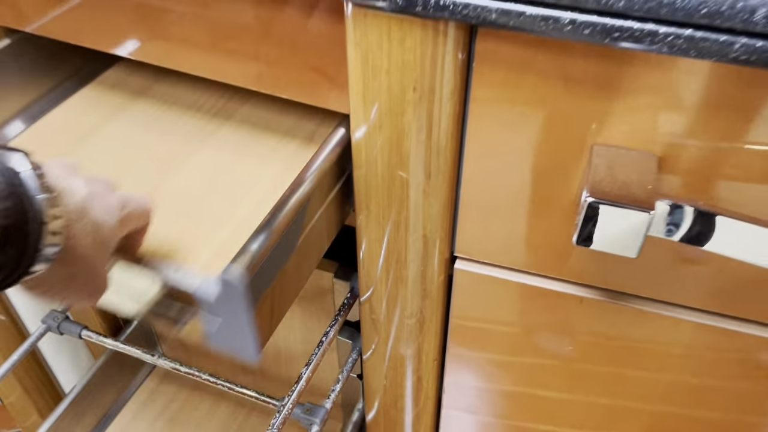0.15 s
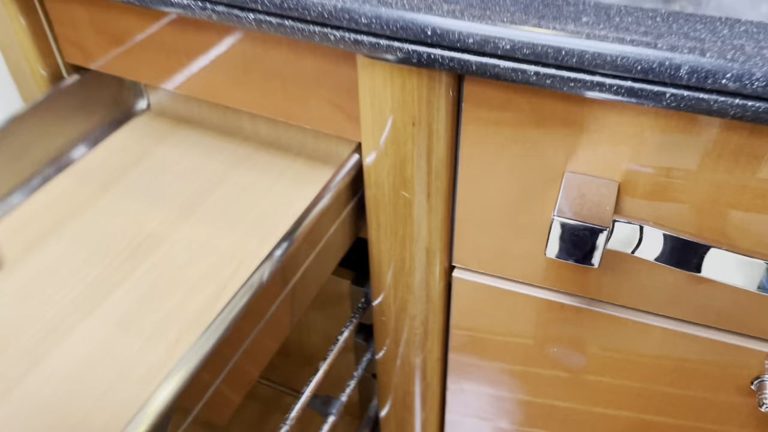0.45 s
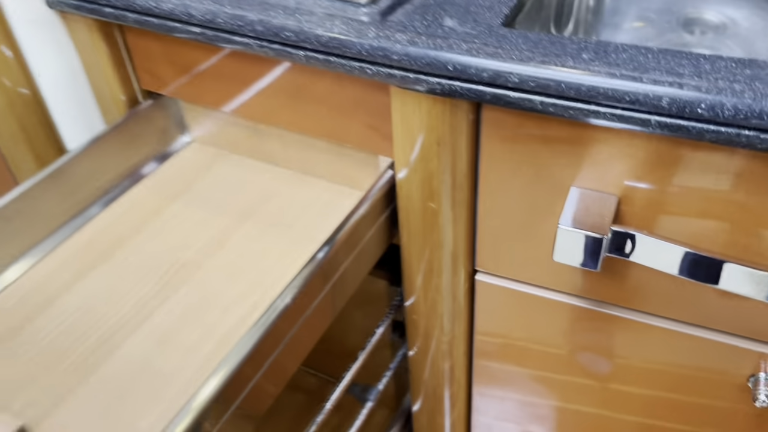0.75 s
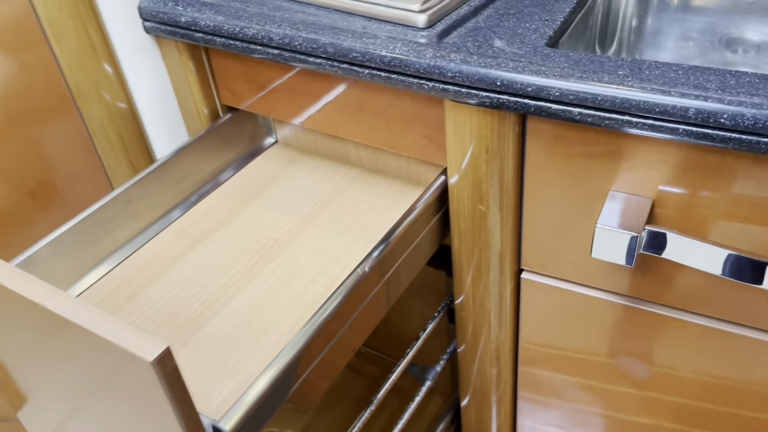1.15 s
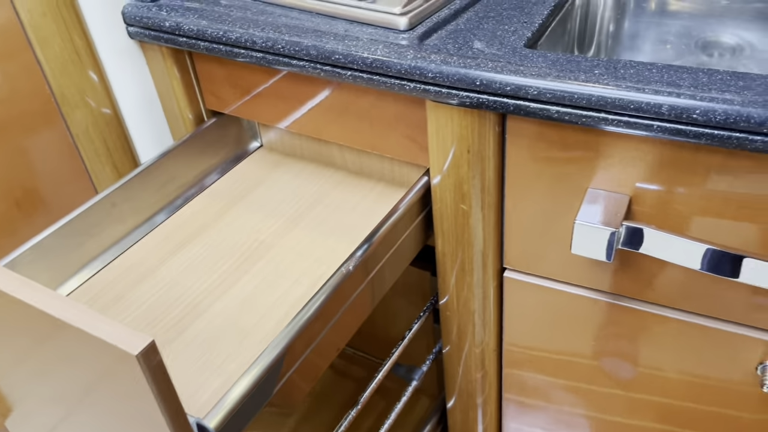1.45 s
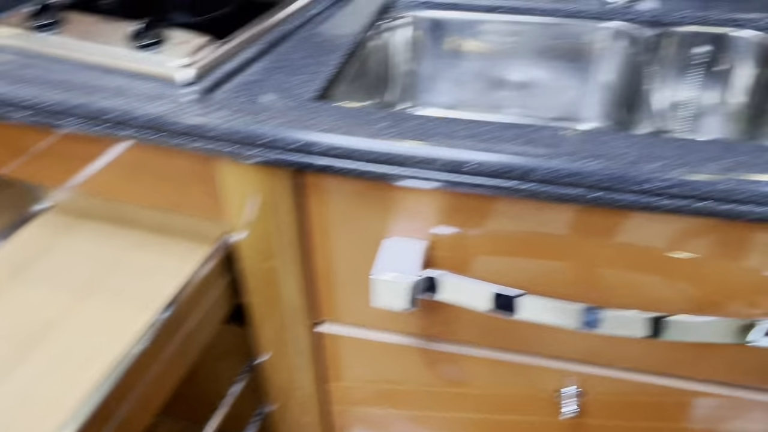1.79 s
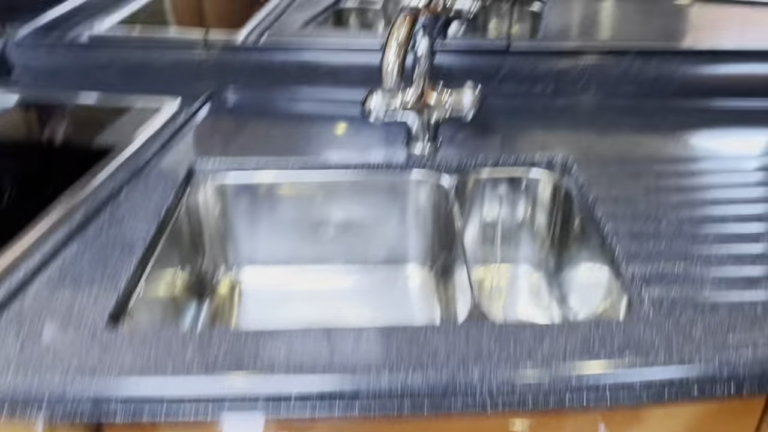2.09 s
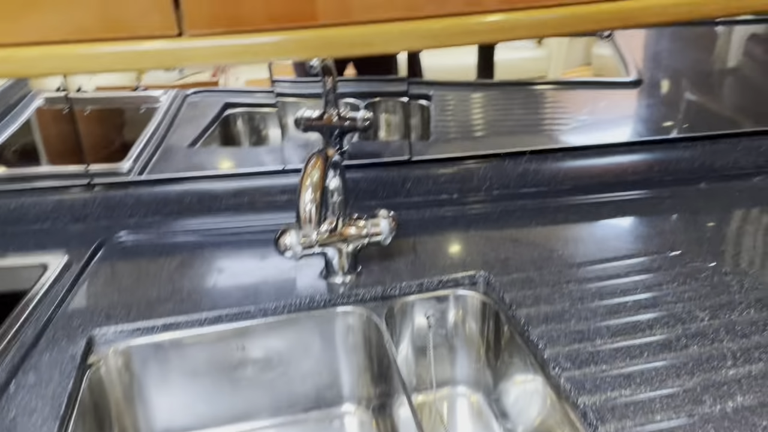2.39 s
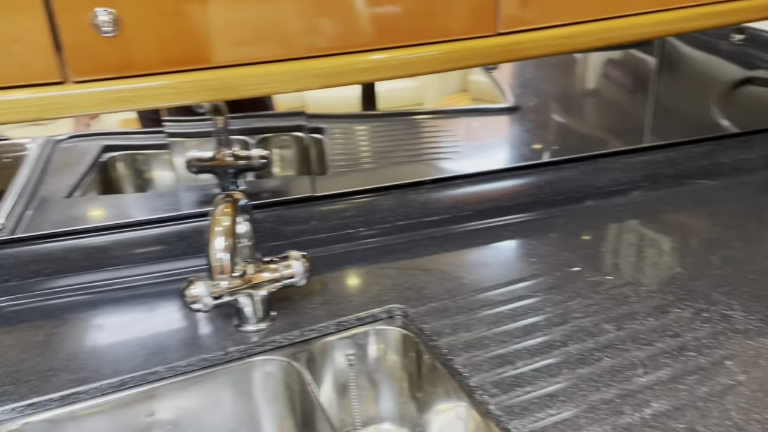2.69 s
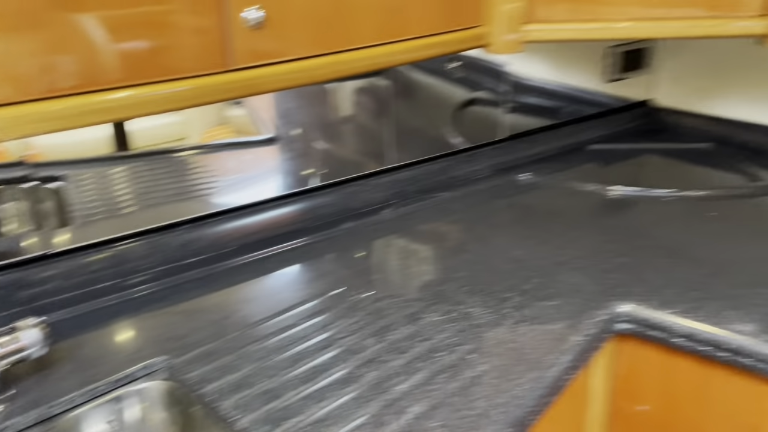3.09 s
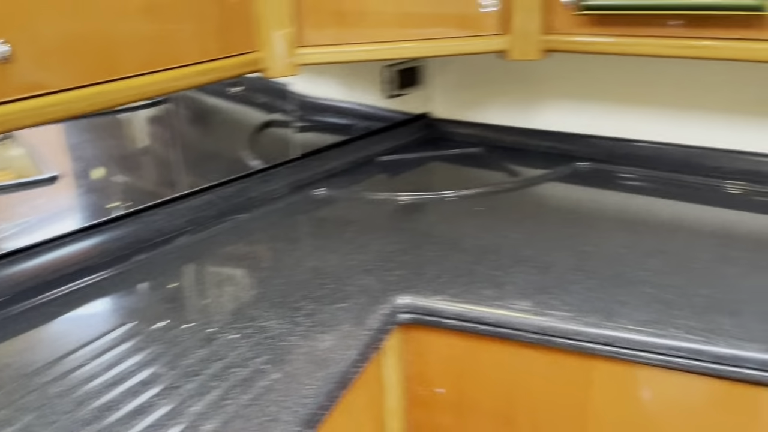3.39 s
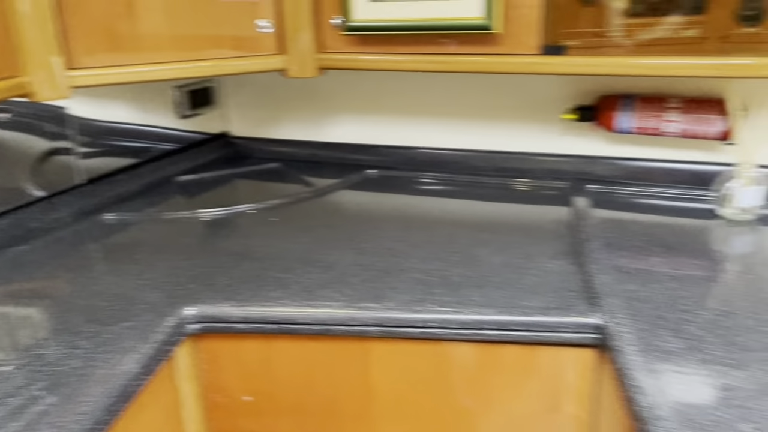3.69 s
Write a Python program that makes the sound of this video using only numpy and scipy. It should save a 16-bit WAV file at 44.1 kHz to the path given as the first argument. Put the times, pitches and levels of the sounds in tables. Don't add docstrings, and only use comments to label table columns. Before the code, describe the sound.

A wooden drawer already rolls on metal ball runners, ticking faintly, bumps over a catch at 0.2 s and slams its stop at 0.54 s with a hard metallic crack. Rumble fades to near quiet by 1.1 s, with a faint sleeve brush around 1.4-1.9. A booming knock frees it at 1.95; it rolls back softly, rattling, bangs shut at 3.04, rebounds dully around 3.25, then settles in the quiet, close cabin.

```python
import sys
import numpy as np
from scipy import signal
from scipy.fft import rfft, irfft
from scipy.io import wavfile
from scipy.ndimage import uniform_filter1d

SR = 44100
rng = np.random.default_rng(int(sys.argv[2]) if len(sys.argv) > 2 else 0)


def bounce(signal):
    frames = np.transpose(np.atleast_2d(signal))
    limited = np.clip(frames, -1, 1)
    pcm = np.round(limited * 32767).astype(np.int16)
    wavfile.write(sys.argv[1], SR, pcm)


def rack_gain(trim_db):
    fader = np.asarray(trim_db, float)
    return 10 ** (fader / 20)


N = 169785
T = np.arange(N) / SR
LEFT_RIGHT = np.array([[.5], [-.5]])


def on_hz(hz, table):
    a = np.array(table)
    return np.interp(np.log(np.maximum(hz, 1)), np.log(a[:, 0]), a[:, 1])


def unit(x):
    return x / np.sqrt(np.mean(x ** 2) + 1e-18)


def peak(x, db):
    return rack_gain(db) * x / np.sqrt(uniform_filter1d(x ** 2, 441).max())


def shade(x, gain):
    size = x.shape[-1]
    return irfft(rfft(x) * gain(np.arange(size // 2 + 1) * SR / size), size)


def coloured(table, size=N):
    return unit(shade(rng.standard_normal(size), lambda hz: rack_gain(on_hz(hz, table))))


def ring(modes, longest):
    t = T[:SR // 2, None]
    hz, db, t60 = np.array(modes).T
    sign = (-1) ** np.arange(len(hz))
    decay = rack_gain(-60 * t / np.clip(t60, .01, longest))
    h = (sign * rack_gain(db) * np.sin(2 * np.pi * hz * t) * decay).sum(axis=1)
    return h / np.abs(h).max()


def walk(rate):
    k = int(SR / rate)
    steps = np.repeat(rng.standard_normal(N // k + 1), k)
    return unit(uniform_filter1d(uniform_filter1d(steps, k), k)[:N])


def clicks(rate, scatter_db, size):
    happens, side, strength = rng.random((3, size))
    return (happens < rate / SR) * np.sign(side - .5) * rack_gain(-scatter_db * np.log(1 - strength))


def add(out, x, at):
    i = int(at * SR)
    out[..., i:i + x.shape[-1]] += x[..., :out.shape[-1] - i]


# (frequency [Hz], level [dB])
CABIN_FLOOR = [(15, -37), (25, -2.5), (74, -11.5), (114, -17.5), (157, -18), (249, -30), (439, -38),
               (16000, -62.5)]


def cabin():
    floor_db = -56.5
    alike = coloured(CABIN_FLOOR)
    apart = np.array([coloured(CABIN_FLOOR), coloured(CABIN_FLOOR)])
    rumble = shade(alike, lambda hz: hz < 400)
    wander = rack_gain(3 * walk(2.5)) - 1
    return rack_gain(floor_db) * (alike + rumble * wander) + rack_gain(floor_db - 7) * apart


# (frequency [Hz], decay time t60 [s])
ROOM_T60 = [(60, 0.92), (300, 0.42), (1500, 0.24), (15000, 0.55)]


def room(x):
    level_db, alike = -11, .4
    t, tail = T[:SR // 2], 0
    seed = rng.standard_normal((3, len(t)))
    seed = np.sqrt(alike) * seed[0] + np.sqrt(1 - alike) * seed[1:]
    for hz in 42.0 * 2 ** np.arange(9):
        band = shade(seed, lambda f: np.clip(1 - np.abs(np.log2(np.maximum(f, 1) / hz)), 0, 1))
        tail = tail + band * rack_gain(-60 * t / on_hz(hz, ROOM_T60))
    tail = tail * (1 - np.exp(-t / 0.006))
    common = lambda f: 1 / (1 + (f / 350) ** 2) + 1 / (1 + (6000 / (f + 1)) ** 4)
    tail = tail + shade(tail.mean(axis=0) - tail, common)
    tail = rack_gain(level_db) * tail / np.sqrt((tail ** 2).sum() / 2)
    return signal.fftconvolve(x[None], tail, axes=1)[:, :N]


# (frequency [Hz], level [dB])
SLEEVE = [(200, -4.5), (2200, -8.5), (6500, -15), (15000, -21)]
SLEEVE_S = (1.359, 1.69, 1.739, 1.96)
SLEEVE_SHARE = (0.099, 0.66, 0.27, 0.45)


def sleeve():
    stroke = np.interp(T, SLEEVE_S, SLEEVE_SHARE, right=0)
    return rack_gain(-55 + 2 * walk(27)) * stroke * coloured(SLEEVE)


# (start [s], length [s], level [dB], pitch [Hz], spread [octaves])
SCRAPES = [(0.306, 0.2, -53.5, 1730, 0.77), (0.751, 0.43, -64.5, 726, .015),
           (0.861, 0.65, -69.5, 1630, 0.34), (1.153, 0.29, -70.5, 397, 0.62), (2.19, 0.2, -65.5, 1600, .08),
           (2.331, 0.15, -59.5, 2910, 0.94), (2.442, .08, -58, 1890, 0.13), (2.659, 0.53, -61.5, 2580, .22),
           (3.02, 0.11, -41, 4940, 0.88), (.535, 0.058, -31, 2600, .9), (3.301, 0.32, -66, 1190, 1.12),
           (3.278, 0.32, -69, 5520, 1.25), (3.55, 0.34, -75.5, 440, 0.14)]


def scrapes():
    flutter_db = 3
    out = np.zeros(N)
    for at, length, db, hz, spread in SCRAPES:
        size = int(length * SR)
        band = shade(rng.standard_normal(N), lambda f: np.exp(-(np.log2((f + 1) / hz) / spread) ** 2))
        rub = (unit(band) * rack_gain(flutter_db * walk(40)))[:size]
        swell = np.sin(np.pi * (np.arange(size) / size) ** 0.59)
        add(out, rack_gain(db) * rub * swell, at)
    return out


# (time [s], level [dB], pitch [Hz], t60 [s])
THUDS = [(.24, -35.5, 75, .3), (.33, -35.5, 61.2, 0.33), (0.537, -29.5, 91.55, 0.092),
         (.76, -43, 72.8, 0.45), (.93, -46, 124.2, .2), (0.979, -46.5, 79.7, 0.17),
         (1.952, -28, 73.5, 0.245), (2.12, -38, 63.5, 0.31), (2.42, -45.5, 95, 0.16),
         (2.54, -41, 91.2, .25), (2.65, -34.5, 72, 0.34), (3.04, -17.5, 55.6, 0.28),
         (3.169, -30, 54.16, 0.94), (3.242, -22, 79, 0.18), (3.271, -27.5, 136.2, 0.2),
         (3.329, -31, 54.2, 0.24), (3.439, -41, 70, 0.18), (3.777, -43, 76.3, 0.55)]


def thuds():
    rise_cycles = 0.53
    out, t = np.zeros(N), T[:SR // 2]
    for at, db, hz, t60 in THUDS:
        pair = ring([(hz, 0, t60), (hz * 1.3, -9, t60 * .7)], 0.96)
        add(out, peak(pair * (1 - np.exp(-t * hz / rise_cycles)), db), at)
    return out


# (time [s], level [dB], pitch [Hz], t60 [s])
TICKS = [(.152, -32.5, 323, 0.083), (0.0046, -41, 1270, 0.67), (0.053, -37, 970, 0.26),
         (.4, -52, 4200, .035), (.435, -53.5, 2800, 0.044), (.537, -18.5, 2100, 0.056),
         (.5372, -21, 3300, .04), (.546, -23, 2300, 0.046), (3.036, -21, 2340, 0.04),
         (1.947, -38.5, 4840, 0.038), (3.022, -42.5, 4900, 0.082), (2.142, -59.5, 3000, 0.045),
         (2.2243, -55, 6800, 0.018), (2.263, -58, 14500, 0.08), (2.262, -60, 6500, 0.018),
         (2.3431, -46, 1680, 0.079), (2.358, -45, 1960, 0.16), (2.405, -58, 2750, .04),
         (2.41, -48, 1860, .16), (2.346, -52, 6400, 0.21), (2.4743, -47.5, 2900, 0.035),
         (2.4745, -49.5, 4500, 0.069), (2.1, -49, 9000, .03), (2.4, -52.5, 2640, 0.066),
         (2.956, -50.5, 4000, 0.18), (2.956, -45.5, 9300, 0.16), (3.3, -57, 3600, .04)]


def ticks():
    out, t = np.zeros(N), T[:SR // 4]
    for at, db, hz, t60 in TICKS:
        spread = .12 * max(hz / 2000, 1) ** 0.62
        band = shade(rng.standard_normal(len(t)), lambda f: np.exp(-(np.log((f + 1) / hz) / spread) ** 2))
        add(out, peak(band * rack_gain(-60 * t / t60) * (1 - np.exp(-t / .001)), db), at)
    return out


# (frequency [Hz], level [dB], t60 [s])
ROLL_MODES = [(319.5, 6, 0.035), (376, -7, 0.12), (420.3, -1.5, 0.075), (466.8, -4.5, 0.089),
              (545.3, -4, 0.05)]
RAIL_MODES = [(255, -10, 0.16), (649, 0, 0.089), (703, 3.5, .05), (859, 1, 0.064), (1062, -2, 0.049),
              (1204, -5.5, 0.052), (1330, -7, 0.026), (1660, -14, 0.013), (1910, -17, 0.023),
              (2430, -17, 0.014)]
# (frequency [Hz], level [dB])
HISS = [(700, -3.5), (1300, -5), (2500, -11.5), (5000, -18), (9000, -16.5), (15000, -37)]
# (time [s], rolling level [dB], rail above it [dB], hiss above it [dB])
PULL = [
    (0, -45.5, 3.5, -5),
    (.2, -42.5, 5.5, -3),
    (.25, -28, -8.5, -7.5),
    (.37, -26, -11, -32),
    (.5, -35, -7, -22),
    (.62, -32, -6, -16.5),
    (.8, -46, -6, -12),
    (.95, -58.5, -13, -1),
    (1.15, -74, -17, -0.5),
]
RETURN = [
    (2.099, -54, 1.5, -11),
    (2.3, -42.5, -11, -14),
    (2.499, -43.5, -7.5, -12),
    (2.58, -41, -7, -7),
    (2.7, -45, -2.5, -18),
    (2.999, -46.5, 2.5, -3),
]


def runners():
    balls_per_s, scatter_db, judder_db, box_low_hz = 2500, 2.5, 0.5, 228
    bumps = clicks(balls_per_s, scatter_db, size=N) * rack_gain(judder_db * walk(28))
    box = unit(signal.fftconvolve(bumps, ring(ROLL_MODES, 1))[:N])
    box = unit(shade(box, lambda hz: 1 / (1 + (box_low_hz / (hz + 1)) ** 3)))
    rail = unit(signal.fftconvolve(bumps, ring(RAIL_MODES, 1))[:N])
    hiss = coloured(HISS) * rack_gain(1.5 * walk(68))
    out = 0
    for table in (PULL, RETURN):
        s, db, rail_db, hiss_db = np.array(table).T
        starts = np.clip((T - s[0] + 0.13) / .05, 0, 1)
        stops = np.clip((s[-1] + 0.039 - T) / 0.042, 0, 1)
        rolling = box + rack_gain(np.interp(T, s, rail_db)) * rail + rack_gain(np.interp(T, s, hiss_db)) * hiss
        out = out + starts * stops * rack_gain(np.interp(T, s, db)) * rolling
    return out


# (frequency [Hz], level [dB])
CRACK = [(150, -9), (500, -3.5), (1200, -3.5), (2500, -11.5), (5000, -16), (9000, -9), (15000, -16)]


def blows(table, modes, left_db=0):
    ring_max_s, rattle_per_s, rattle_rise_s = 0.17, 3000, 0.0039
    crack_t60_s, crack_top_t60_s = 0.11, 0.048
    hardness_slope, crack_apart, crack_rise_cycles = 0.75, .45, 2.5
    out, t = np.zeros((2, N)), T[:SR // 3]
    for at, db, rattle, hard_hz, crack_db in table:
        push = clicks(rattle_per_s, 0, size=len(t))
        push[0] = 3.5 * min(hard_hz / 2000, 1)
        force = np.exp(-t / rattle) * (1.3 - np.exp(-t / rattle_rise_s))
        soft = signal.lfilter(*signal.butter(1, min(hard_hz, 15000), fs=SR), push * force)
        add(out, peak(signal.fftconvolve(soft, ring(modes, ring_max_s)), db), at)

        near, apart = coloured(CRACK, size=len(t)), coloured(CRACK, size=len(t))
        side = shade(apart, lambda hz: (hz > 250) / (1 + (hz / 6000) ** 4))
        wood = near + crack_apart * side * np.array([[1], [-1]])
        wood = shade(wood, lambda hz: (1 + (hz / hard_hz) ** 2) ** -hardness_slope)
        wood = wood * (1 - np.exp(-t * hard_hz / crack_rise_cycles))
        dull = signal.lfilter(*signal.butter(1, 1500, fs=SR), wood)
        energy = (push * np.exp(-t / rattle)) ** 2

        def shake(t60):
            return np.sqrt(np.abs(signal.fftconvolve(energy, rack_gain(-120 * t / t60))[:len(t)]))

        crack = dull * shake(crack_t60_s) + (wood - dull) * shake(crack_top_t60_s)
        add(out, peak(crack, db + crack_db), at)
    return out * rack_gain(LEFT_RIGHT * left_db)


# (frequency [Hz], level [dB], t60 [s])
CATCH_BLOWS = [
    (.2224, -26.5, 0.034, 4230, 4),
    (.83, -48.5, 0.026, 3000, 3.5),
    (.853, -50, .015, 3030, 7.5),
]


def catch():
    return blows(CATCH_BLOWS, ROLL_MODES)


OUT_MODES = [(250, -9.5, 0.13), (327, -12.5, 0.12), (461.7, -12, 0.21), (521.6, 1.5, 0.081),
             (680, -19.5, 0.055), (994, -8, 0.087), (1250, -12, 0.13), (1440, -15.5, 0.073),
             (2050, -13, .05), (2290, -17, .08), (2800, -19, 0.056)]
OUT_BLOWS = [
    (.514, -34.5, .006, 602, -5),
    (.526, -25, .01, 1486, -1),
    (.5368, -14, 0.0019, 6000, 2),
    (.542, -8.5, 0.0039, 900, -3.5),
]


def outer_stop():
    return blows(OUT_BLOWS, OUT_MODES, left_db=-0.8)


PUSH_MODES = [(246.6, 0.5, 0.48), (301.2, -4.5, 0.12), (474.4, 3, 0.074), (561.6, -6, 0.28),
              (643, -6, 0.072), (733, -14, .1), (1138, -9.5, 0.058)]
PUSH_BLOWS = [
    (1.825, -48.5, 0.042, 516, 2.5),
    (2.5262, -39.5, 0.02, 3510, 1.5),
    (2.575, -34.5, .03, 590, -5),
    (1.934, -45, 0.011, 1500, 4.5),
    (1.952, -11, 0.012, 1740, -2.5),
    (1.995, -21, 0.018, 910, -3.5),
]


def push_free():
    return blows(PUSH_BLOWS, PUSH_MODES, left_db=-0.8)


SHUT_MODES = [(271, -3.5, 0.091), (402.7, -8.5, 0.12), (449.5, -1.5, 0.038), (523, -5, 0.037),
              (662.8, -2.5, 0.054), (774, -6, 0.042), (1030, -13, 0.045), (1274, -5.5, 0.076),
              (1493, -6, 0.025), (2116, -17, .05)]
SHUT_BLOWS = [
    (3.022, -20, .008, 1055, 2.2),
    (3.035, -13, 0.0083, 1726, 1.2),
    (3.046, -11, 0.013, 1310, 0.35),
]


def shutting():
    return blows(SHUT_BLOWS, SHUT_MODES, left_db=-0.2)


REBOUND_MODES = [(173.2, -8.5, 0.34), (291.6, 9, 0.093), (319.5, -21, 0.085), (440, -14, 0.064),
                 (796, -13.5, .06)]
REBOUND_BLOWS = [
    (2.997, -21.5, 0.021, 550, -1),
    (3.24, -30.5, 0.018, 900, -0.5),
    (3.269, -18, .005, 696, -6.5),
    (3.289, -23, 0.012, 500, -5.5),
    (3.372, -43, 0.011, 298, -4.5),
    (3.45, -62, 0.023, 304, 1),
    (3.775, -57.5, 0.025, 250, -3.5),
]


def rebound():
    return blows(REBOUND_BLOWS, REBOUND_MODES)


# (frequency [Hz], left minus right [dB])
PORT_PHASE = [(30, 0), (300, .5), (1300, 1.9), (2400, .3), (4500, 1.1), (8600, -3.14), (12300, -6.1),
              (16000, -6.4)]
PORT_BALANCE = [(60, -3), (400, -0.5), (700, 1), (1500, -1.5), (4400, 4), (9000, 1.95)]


def scene():
    drawer = sleeve() + scrapes() + thuds() + ticks() + runners()
    drawer = drawer + catch() + outer_stop() + push_free() + shutting() + rebound()
    both = cabin() + room(drawer.mean(axis=0)) + drawer

    def ports(hz):
        return rack_gain(LEFT_RIGHT * on_hz(hz, PORT_BALANCE)) * np.exp(1j * LEFT_RIGHT * on_hz(hz, PORT_PHASE))

    return shade(both, ports)


def band_limit(x):
    return signal.sosfilt(signal.butter(12, 16460, fs=SR, output="sos"), x)


def record(dry):
    dry = signal.sosfilt(signal.butter(3, 38.3, "high", fs=SR, output="sos"), dry)
    dry = signal.sosfilt(signal.butter(4, 15500, fs=SR, output="sos"), dry)
    mix = np.tanh(1.09 * dry) / 1.006
    return band_limit(mix)


dry = scene()
out = record(dry)
bounce(out)
```